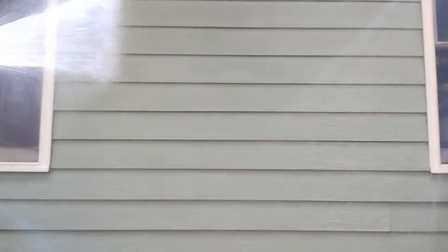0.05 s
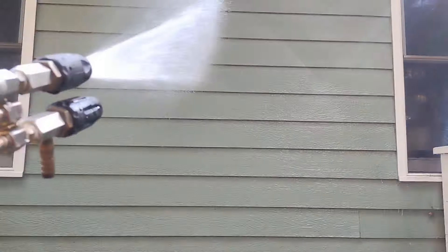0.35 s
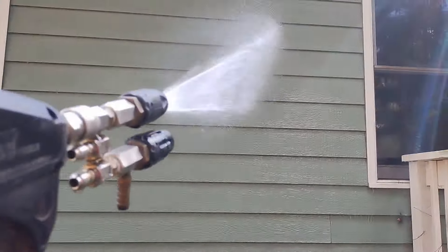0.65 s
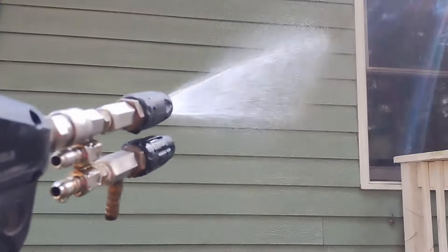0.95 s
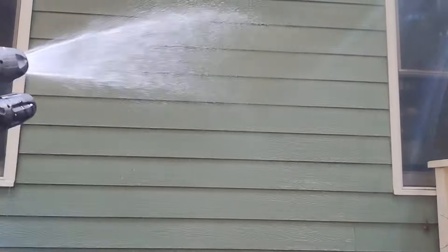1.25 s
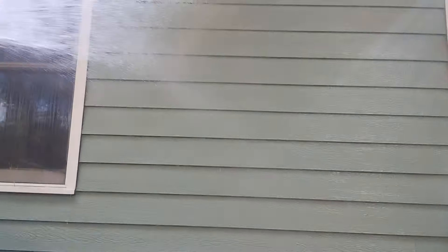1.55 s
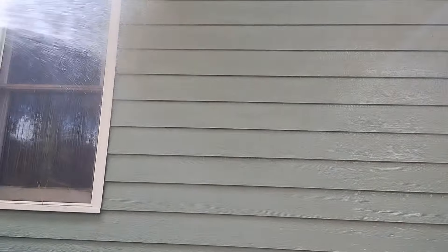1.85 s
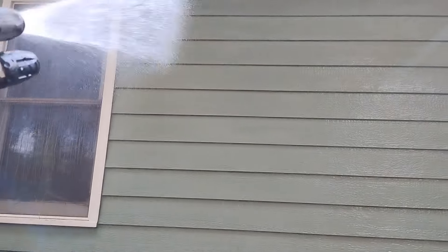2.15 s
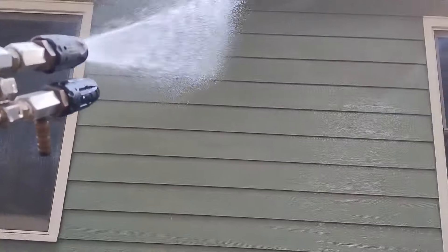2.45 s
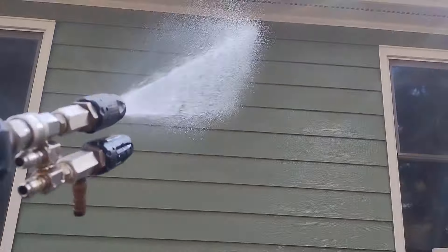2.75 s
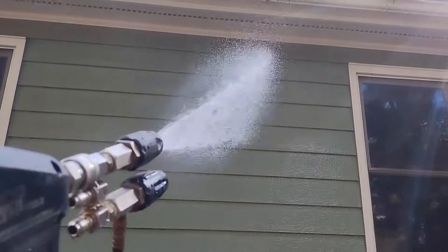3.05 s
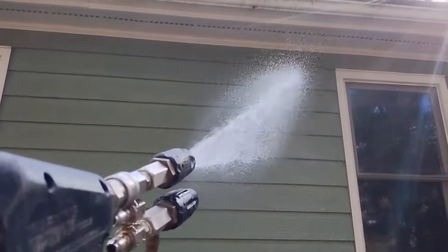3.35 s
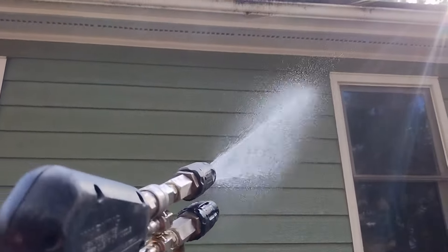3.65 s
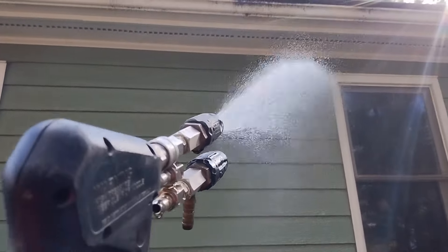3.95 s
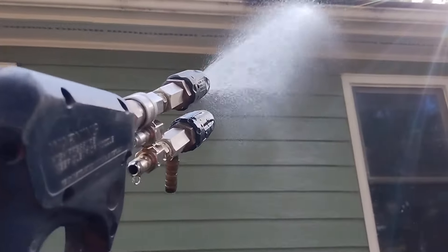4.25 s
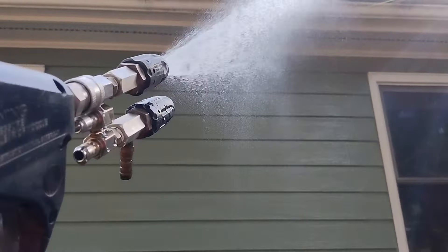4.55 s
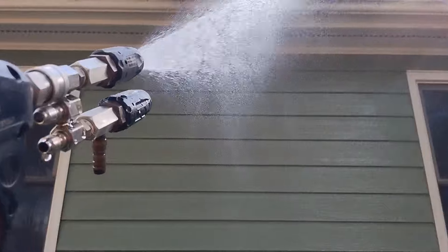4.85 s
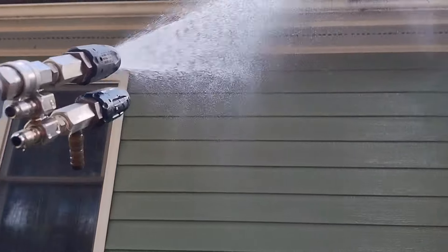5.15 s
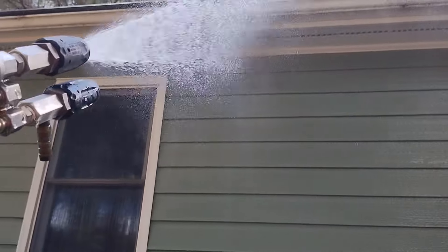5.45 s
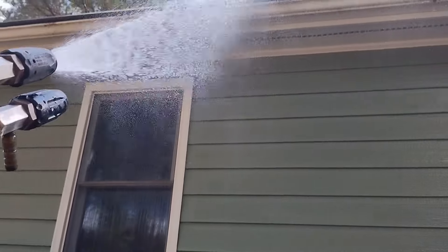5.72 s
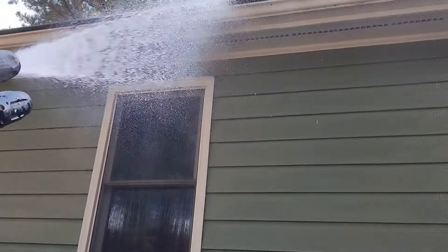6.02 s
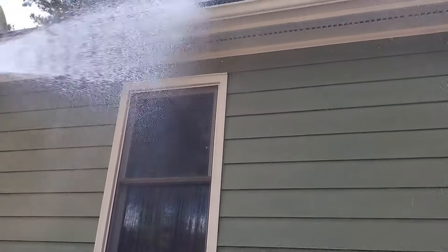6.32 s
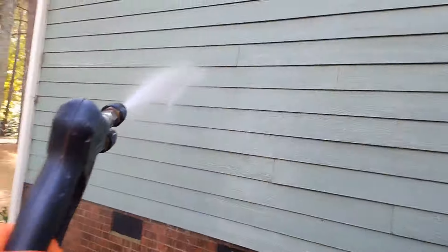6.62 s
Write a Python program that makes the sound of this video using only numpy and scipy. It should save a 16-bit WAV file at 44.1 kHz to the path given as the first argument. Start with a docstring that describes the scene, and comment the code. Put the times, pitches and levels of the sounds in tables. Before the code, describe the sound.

A pressure washer hisses and patters steadily against wooden siding, then drums louder on a hollow eave, over a faint distant engine.

```python
"""Pressure washer on wooden siding

A fan of water patters over the boards, then climbs to the hollow eave, which drums under the jet.
Random drop impacts excite the resonances of the wood; the mist hisses, and the turbulent jet sings
in narrow, fluttering bands. Wall, eave and ground reflect the spray.
The pump's single-cylinder engine runs some way off."""
import sys
import numpy as np
from scipy import signal
from scipy.fft import rfft, irfft, next_fast_len
from scipy.io import wavfile
from scipy.ndimage import uniform_filter1d, map_coordinates

SR = 44100
rng = np.random.default_rng(int(sys.argv[2]) if len(sys.argv) > 2 else 0)


def dump(signal):
    """Clip the signal to [-1, 1] and save it as 16-bit WAV at the path in sys.argv[1]."""
    limited = np.clip(np.atleast_2d(signal).T, -1, 1)
    pcm = np.round(limited * 32767).astype(np.int16)
    wavfile.write(sys.argv[1], SR, pcm)


N = 294588
TIME = np.arange(N) / SR
CLIMB_S, EAVE_S, TOP_S = 3.8, 4.335, 4.85  # the aim starts to climb, touches the eave, lies fully on it
TRIM_S, LIP_S = 4.79, 5.28  # the jet crosses the trim board, then the lip of the eave
NARROW_FROM_S, NARROW_TO_S = 2.38, 3.37  # the fan is at its narrowest
WALL_IMPACT_DB, EAVE_IMPACT_DB = -51, -35  # usual impact levels


def amp(db):
    """Amplitude ratio of a level in decibels."""
    return 10 ** (np.asarray(db) / 20)

def unit(x):
    """Normalisation of a signal, or the mean of a stereo pair, to rms 1."""
    return x / np.sqrt(np.mean(np.atleast_2d(x).mean(axis=0) ** 2) + 1e-20)

def along(points, hz):
    """Interpolation of (f/Hz, value) points on a logarithmic frequency axis."""
    f, v = np.transpose(points)
    return np.interp(np.log(hz + 1), np.log(f + 1), v)

def curve(points):
    """Linear interpolation of (t/s, value) points at every sample."""
    return np.interp(TIME, *np.transpose(points))

def ramp(start, end):
    """Linear rise from 0 to 1 between two times."""
    return np.clip((TIME - start) / max(end - start, 1 / SR), 0, 1)

def held(start, end, attack_s, release_s):
    """Trapezoidal envelope: it rises from start, holds, and falls from end."""
    return ramp(start, start + attack_s) * (1 - ramp(end, end + release_s))

def spells(rows, attack_s, release_s):
    """Sum of trapezoidal envelopes, one for each (start/s, end/s, level/dB) row."""
    return sum(amp(db) * held(start, end, attack_s, release_s) for start, end, db in rows)

def swell(peak_s, rise_db_per_s, fall_db_per_s):
    """Exponential growth to a gain of 1, then exponential decay."""
    t = TIME - peak_s
    return amp(np.minimum(rise_db_per_s * t, -fall_db_per_s * t))

def wobble(rate):
    """Smooth random modulation with rate knots a second."""
    knots = rng.standard_normal(int(N * rate / SR) + 4)
    return map_coordinates(knots, [np.arange(N) * rate / SR])

def filtered(x, response):
    """Linear filtering: the spectrum of x times a frequency response."""
    size = next_fast_len(N + SR // 2)
    return irfft(rfft(x, size) * response(np.fft.rfftfreq(size, 1 / SR)), size)[..., :N]

def coloured(x, spectrum):
    """Spectral shaping by (f/Hz, gain/dB) points."""
    return filtered(x, lambda hz: amp(along(spectrum, hz)))

def sides(db):
    """Constant-power panning: two gains for a left-minus-right level difference."""
    gains = amp(np.array([np.atleast_1d(db), -np.atleast_1d(db)]) / 2)
    return gains / np.sqrt(np.mean(gains ** 2, axis=0))

def leading(pair, lead_s):
    """Arrival-time difference: the left side leads the right by lead_s."""
    return filtered(pair, lambda hz: np.exp(1j * np.pi * lead_s * np.array([hz, -hz])))

# Likeness of the two sides, high in the bass: f/Hz, correlation (clipped to +-1)
CORRELATION = [(100, 0.87), (300, 0.83), (650, 0.9), (850, -0.2), (1100, 1.1), (1280, .5), (1500, -0.3),
               (2000, 0.5), (3300, 0), (14000, 0)]
# Shading between the two sides: f/Hz, left minus right/dB
BALANCE = [(200, 0), (500, -2), (800, -2), (1000, -5), (1300, -4), (1550, -1.5), (1850, -1), (2200, 0),
           (2900, 5.5), (4100, -2), (4800, -18.5), (5500, -8.5)]
def stereo(pair, balance=BALANCE, correlation=CORRELATION):
    """Partial coherence: two independent signals mix as mid and side, then are shaded by frequency."""
    angle = lambda hz: np.arccos(np.clip(along(correlation, hz), -1, 1)) / 2
    mid, side = filtered(pair, lambda hz: np.array([np.cos(angle(hz)), np.sin(angle(hz))]))
    left_right = np.array([mid + side, mid - side])
    return unit(filtered(left_right, lambda hz: sides(along(balance, hz))))

def droplets(rate, spread_db):
    """Shot noise: two streams of random impacts, rate a second, of scattered sizes."""
    hits = rng.random((2, N)) < rate / SR
    return unit(hits * rng.standard_normal((2, N)) * amp(spread_db * rng.standard_normal((2, N))))

def struck(modes, rate, spread_db):
    """Modal superposition: drops land all over a panel, so each resonance gets its own blows."""
    def resonance(centre, width):
        # second order applied twice: each blow swells and dies softly on wet wood
        return lambda hz: (1j * hz * width / (centre ** 2 - hz ** 2 + 1j * hz * width)) ** 2
    return sum(amp(db) * filtered(droplets(rate, spread_db), resonance(centre, 1.5 * width))
               for centre, width, db in modes)

def turbulence(centre_hz, width_hz):
    """Narrow-band noise: two channels of low-passed noise modulate a moving carrier in quadrature."""
    slow = filtered(rng.standard_normal((2, 2, N)), lambda hz: 1 / (1 + (hz / width_hz) ** 2))
    phase = 2 * np.pi * np.cumsum(centre_hz) / SR
    return unit(slow[0] * np.cos(phase) + slow[1] * np.sin(phase))


# Engine tones: multiple of the shaft frequency, relative level/dB
ENGINE_ORDERS = [(1, -73.5), (2, -62), (2.5, -65), (3, -62), (4, -65.5), (4.5, -74), (5, -75)]
# Exhaust noise spectrum: f/Hz, relative level/dB
EXHAUST_SPECTRUM = [(20, -39.5), (38, -24.5), (50, -14), (75, -6.5), (110, -2), (170, -0.5), (260, 0),
                    (350, -2.5), (500, -6), (1000, -6), (4000, -65)]
def engine(shaft_hz=49):
    """Four-stroke cycle: wavering tones, and exhaust that puffs each turn, harder every second one."""
    turns = np.cumsum(shaft_hz * (1 + 0.0091 * wobble(4))) / SR
    hum = np.zeros(N)
    for order, db in ENGINE_ORDERS:
        gain = np.sqrt(2) * amp(db - 0.5 + 2 * wobble(7.8))
        hum += gain * np.sin(2 * np.pi * (order * turns + rng.random()))
    puffs = amp(2 * np.cos(2 * np.pi * turns) + 0.15 * np.cos(np.pi * turns))
    exhaust = coloured(puffs * rng.standard_normal((2, N)), EXHAUST_SPECTRUM)
    return hum + amp(-50.5) * stereo(exhaust)

# Echoes from wall, eave and ground: delay/s, gain/dB
ECHOES = [(.0026, -15), (.0061, -19), (.0093, -15), (0.0146, -16.5)]
def reflected(pair):
    """Comb filtering: echo paths drift with the gun, so their interference ripples the colour."""
    echo = lambda x, delay: np.interp(TIME - delay - 0.00012 * wobble(1.498), TIME, x, left=0)
    echoes = np.array([sum(amp(db) * echo(x, delay) for delay, db in ECHOES) for x in pair])
    # lapped boards scatter the highest treble away
    return amp(-0.4) * (pair + filtered(echoes, lambda hz: 1 / (1 + (hz / 8000) ** 4)))

# Treble dips on the left, with the aim at the wall and at the eave: f/Hz, gain/dB
WALL_NOTCHES = [(4700, 0), (5400, 1), (6100, 0), (6600, -4), (7150, -5), (7700, -1), (10500, 0),
                (12500, -1), (14200, 2.5)]
EAVE_NOTCHES = [(4800, 0.5), (5200, 1), (5400, -6), (5560, -8.5), (5800, 1.5), (6500, 0), (8000, 0.5),
                (14200, 0)]
def notched(pair):
    """Notch filtering: one set of dips on the left fades into another as the aim turns upwards."""
    left, right = pair
    up = ramp(4.6, 5.05)
    return np.array([(1 - up) * coloured(left, WALL_NOTCHES) + up * coloured(left, EAVE_NOTCHES), right])

def patchy(pair, depth_db):
    """Random spectral modulation: the colour shifts in patches some 500 Hz by a third of a second."""
    spectra = signal.stft(pair, nperseg=512)[2]
    field = rng.standard_normal(spectra.shape)
    for _ in range(2):
        field = uniform_filter1d(uniform_filter1d(field, size=5, axis=1), size=56, axis=2)
    return signal.istft(spectra * amp(depth_db * field / field.std()), nperseg=512)[1][:, :N]

# Spectrum of the coarse drops: f/Hz, relative level/dB
SIZZLE_SPECTRUM = [(2500, -48), (3800, -1), (4800, -2.5), (5400, -2), (6100, 3), (7000, 2), (8000, -4),
                   (9500, -26.5), (14000, -40)]
# Their shading on the left: f/Hz, left minus right/dB
SIZZLE_BALANCE = [(4000, 1), (4700, -3.5), (5500, -16), (6100, -18), (7000, -9.5), (8200, -14)]
def coarse_drops(excess_db, burst_db):
    """Shot noise of large drops: more sizzle down as the aim climbs and as the eave soaks through."""
    climb_db = 5 * ramp(CLIMB_S - 0.45, EAVE_S + 0.09)
    soaked_db = 4 * ramp(4.5, 6.3)
    level_db = -51.5 + 0.37 * excess_db + np.outer([0.55, 1.25], burst_db) + climb_db + soaked_db
    sizzle = coloured(droplets(rate=28000, spread_db=1), SIZZLE_SPECTRUM)
    return amp(level_db) * stereo(sizzle, SIZZLE_BALANCE)

# Spectra of the mist and of its finest spray: f/Hz, relative level/dB
HISS_SPECTRUM = [(5000, -22.5), (7000, -5.5), (8300, 0), (9300, -1), (10300, -1), (11300, -1),
                 (12500, -6.5), (14500, -15.5)]
FINE_SPECTRUM = [(8000, -40), (10500, -12), (12000, -1), (13000, -.5), (14400, -2)]
# Shading of both on the left: f/Hz, left minus right/dB
MIST_BALANCE = [(7000, -6), (8200, -1), (10000, 0), (14000, 0.5)]
# Hiss from the amount of mist in the air: t/s, relative level/dB
MIST_LEVEL = [(0.05, -44), (0.35, -46.5), (0.9, -46.5), (1.3, -44.5), (1.9, -45.5), (3.4, -46.0),
              (4.0, -44), (4.55, -39.5), (5.1, -37), (5.48, -35), (5.75, -37.5), (6.05, -35.5), (6.5, -37)]
def tiny_drops(excess_db, burst_db):
    """Atomisation: countless drops hiss; the lip shatters more fine spray, a narrow fan makes less."""
    hiss = stereo(coloured(droplets(rate=25000, spread_db=-0.5), HISS_SPECTRUM), MIST_BALANCE)
    fine = stereo(coloured(droplets(rate=24000, spread_db=1), FINE_SPECTRUM), MIST_BALANCE)
    lip_db = held(EAVE_S, LIP_S + 0.37, attack_s=0.61, release_s=0.25)
    narrow_db = -1.5 * held(NARROW_FROM_S, NARROW_TO_S, attack_s=0.4, release_s=0.9)
    fine_db = -47.5 + 0.55 * excess_db + burst_db + lip_db + narrow_db
    return amp(1.23 + curve(MIST_LEVEL)) * hiss + amp(fine_db) * fine

# Spray thrown back as the fan swings: start/s, nominal boost/dB
SPRAY_BURSTS = [(-.1, 1), (1.175, 4.5), (5.88, 0.5)]
# The gun passing on the left: t/s, change of level/dB
GUN_SHADOW = [(.17, 1.5), (.4, -4), (.55, -1), (.8, -9), (1.17, -8), (1.26, 0), (1.7, 0), (2.08, 0),
              (2.25, -6), (2.66, -4), (2.76, 0), (2.87, -6.5), (3.04, 1), (3.15, -4), (3.25, -8),
              (3.42, -7.5), (3.52, 1)]
def mist(impact_db, flow_db):
    """Acoustic shadowing: amid the sizzle, the moving gun screens the hiss of tiny drops on the left."""
    excess_db = impact_db - WALL_IMPACT_DB
    burst_db = sum(db * held(s, s + 0.14, attack_s=0.06, release_s=0.47) for s, db in SPRAY_BURSTS)
    left_db = -7.5 + curve(GUN_SHADOW)  # the left side faces away from the mist
    sizzle = coarse_drops(excess_db, burst_db)
    hiss = tiny_drops(excess_db, burst_db) * amp([left_db, np.zeros(N)])
    return (sizzle + hiss) * amp(flow_db)

# Centre of the jet's main band: t/s, f/Hz
SING_CENTRE = [(1.0, 7870), (2.4, 7760), (2.9, 7900), (3.6, 7840), (4.2, 7970), (4.9, 8100)]
# Spells in which it sings, and in which it spreads into a rush: start/s, end/s, relative level/dB
SINGING = [(2.17, 2.6, -57), (2.56, 4.1, -46), (4.1, 4.95, -42.5), (4.95, 5.45, -45.5), (5.45, 6.5, -54)]
RUSHING = [(.35, 1.25, -50.5)]
def singing_sheet():
    """Flutter of a water sheet: a band with a purer core when the fan is narrow, a rush when wide."""
    centre_hz = curve(SING_CENTRE)
    flare = amp(-46) * swell(3.48, rise_db_per_s=250, fall_db_per_s=400)  # the fan widens again
    gain = amp(-59.5) + spells(SINGING, attack_s=0.41, release_s=0.3) + flare
    narrow = held(NARROW_FROM_S - 0.4, NARROW_TO_S, attack_s=0.25, release_s=2.2)
    core = 0.52 * narrow * turbulence(centre_hz + 35 * wobble(25), width_hz=70)
    flutter = amp(1.4 * wobble(70) + 0.47 * wobble(11))
    band = turbulence(centre_hz + 80 * wobble(60), width_hz=310)
    rush = spells(RUSHING, attack_s=0.29, release_s=0.3) * turbulence(centre_hz, width_hz=500)
    return gain * flutter * (band + core) + rush

# Centre of the jet's thinner, lower band: t/s, f/Hz
WHISTLE_CENTRE = [(.2, 6260), (1.3, 6170), (4.4, 6060), (4.85, 6580), (5.6, 6550)]
# Spells in which it whistles: start/s, end/s, relative level/dB
WHISTLING = [(-.4, .3, -60), (1.0, 1.8, -58.5), (1.8, 2.45, -55.5), (2.45, 3.7, -62), (3.7, 4.5, -61.5),
             (4.7, 5.55, -50)]
def whistle():
    """Amplitude-modulated turbulence: a thin band rises as the aim climbs and flares past the lip."""
    flare = amp(-37.5) * swell(5.32, rise_db_per_s=28, fall_db_per_s=69.5)
    gain = amp(-63.5) + spells(WHISTLING, attack_s=0.28, release_s=0.33) + flare
    flutter = amp(1.9 * wobble(40))
    return gain * flutter * turbulence(curve(WHISTLE_CENTRE) + 20 * wobble(14), width_hz=156)

def jet():
    """Turbulent flow noise: the jet sings, shrills on the climb, fizzes past the lip, rasps if narrow."""
    song = singing_sheet() + whistle()
    shrill_hz = np.interp(TIME, [CLIMB_S, TOP_S], [9480, 11170])
    shrill = amp(-46.5) * ramp(CLIMB_S - 0.2, CLIMB_S + 0.17) * turbulence(shrill_hz, width_hz=540)
    shrill *= swell(TOP_S, rise_db_per_s=9, fall_db_per_s=4)
    fizz = amp(-43.5) * turbulence(12600 + 90 * wobble(7.1), width_hz=420)
    fizz *= swell(5.45, rise_db_per_s=12, fall_db_per_s=37)
    rasp = amp(-53.5 + 2.4 * wobble(13)) * turbulence(4600 + 160 * wobble(12), width_hz=560)
    rasp *= held(NARROW_FROM_S, NARROW_TO_S, attack_s=0.54, release_s=0.11)
    return song * sides(db=-19.5) + (shrill + fizz) * sides(db=-18.5) + rasp * sides(db=-7.5)

# Modes of the clapboards, a window and its frame: f/Hz, bandwidth/Hz, relative level/dB
BOARD_MODES = [(593, 99, 2), (1060, 110, -2), (1298, 210, -2), (2004, 490, -5.5), (2380, 330, -5.5),
               (2760, 630, -4.5), (3950, 390, -22.5)]
WINDOW_MODES = [(1173, 125, -3), (1940, 170, -8)]
FRAME_MODES = [(3780, 540, 0)]
# Passes of the fan over window and frame: start/s, end/s, relative level/dB
ON_WINDOW = [(-.3, .1, -56), (.62, 1.28, -53), (1.5, 1.8, -56)]
ON_FRAME = [(-.2, .06, -51), (2.1, 2.75, -56)]
# Spectrum of the splash: f/Hz, relative level/dB
SPLASH_SPECTRUM = [(100, -46.5), (300, -4.5), (600, -0.5), (1500, 1.5), (3000, -6), (3600, -4.5),
                   (5000, -20), (8000, -27.5), (14000, -50)]
# Likeness of the two sides for sound from the wall: f/Hz, correlation
WALL_CORRELATION = [(100, .9), (350, 0.45), (650, 0.9), (900, 0.55), (1200, 0.21), (1400, -1),
                    (1800, -0.063), (2300, 0.1), (3200, -0.023)]
def siding(impact_db, flow_db):
    """Impact excitation: drops patter and splash on the boards and set a window and its frame ringing."""
    from_wall = lambda pair: stereo(pair, correlation=WALL_CORRELATION)
    boards = from_wall(struck(BOARD_MODES, rate=11000, spread_db=1))
    splash = from_wall(coloured(droplets(rate=24000, spread_db=0.5), SPLASH_SPECTRUM))
    window = from_wall(struck(WINDOW_MODES, rate=5500, spread_db=-1.5))
    window *= spells(ON_WINDOW, attack_s=0.18, release_s=0.26)
    frame = unit(struck(FRAME_MODES, rate=7100, spread_db=0.5)) * sides(db=9)
    frame *= spells(ON_FRAME, attack_s=0.17, release_s=0.2)
    drive = amp(np.minimum(impact_db, -45.5) + flow_db)  # any harder impact lands on the eave
    patter = drive * (amp(2) * boards + amp(-2) * splash)
    return leading(patter + window + amp(-3.5) * frame, lead_s=0.00017)

# Lower and upper modes of the boxed eave: f/Hz, bandwidth/Hz, relative level/dB
LOWER_CAVITY_MODES = [(265, 70, -17.5), (372, 100, -10), (452, 63, -2), (500, 70, -1)]
UPPER_CAVITY_MODES = [(604, 72, -3.5), (639, 73, -6.5)]
def cavity_boom(impact_db):
    """Cavity resonance: the hollow eave booms, its upper modes taking over as the jet moves along."""
    lower = stereo(struck(LOWER_CAVITY_MODES, rate=2000, spread_db=1))
    upper = stereo(struck(UPPER_CAVITY_MODES, rate=2000, spread_db=3))
    upper_db = -7.5 + 5 * (TIME - EAVE_S)
    level_db = -40.5 + 0.65 * (impact_db - EAVE_IMPACT_DB)
    return amp(level_db) * (lower + amp(upper_db) * upper) * ramp(EAVE_S - 0.08, EAVE_S + 0.2)

# Modes of the eave's thin boards, lip and trim: f/Hz, bandwidth/Hz, relative level/dB
FASCIA_MODES = [(995, 67, -4), (1130, 290, -7), (1294, 98, -3), (1453, 240, -2), (1920, 270, -1.5),
                (2166, 310, -4), (2560, 270, -4), (3005, 360, -5), (3175, 220, -4.5), (3740, 320, -14),
                (4950, 480, -10)]
EAVE_LIP_MODES = [(1177, 240, 1), (1910, 260, -3), (2600, 130, -3.5), (3006, 95, -5)]
TRIM_MODES = [(1370, 140, -5.5), (1927, 75, -6), (2610, 89, 3)]
def eave(impact_db, flow_db):
    """Forced vibration: the eave booms and rattles, and its trim and lip ring as the jet crosses them."""
    boom = cavity_boom(impact_db)
    graze = 0.38  # share of the rattle while only the edge of the fan reaches the eave
    share = graze * ramp(CLIMB_S - 0.1, CLIMB_S + 0.24) + (1 - graze) * ramp(EAVE_S, EAVE_S + 0.3)
    rattle = share * amp(impact_db + 0.5) * stereo(struck(FASCIA_MODES, rate=3500, spread_db=3))
    lip = amp(-35.5) * stereo(struck(EAVE_LIP_MODES, rate=4000, spread_db=6.5))
    lip *= swell(LIP_S, rise_db_per_s=18, fall_db_per_s=24)
    trim = amp(-45) * stereo(struck(TRIM_MODES, rate=4100, spread_db=2))
    trim *= swell(TRIM_S, rise_db_per_s=30, fall_db_per_s=13)
    return leading(boom + amp(flow_db) * (rattle + trim + lip), lead_s=-0.00005)

# How hard the water strikes the wood: t/s, level/dB
IMPACT_LEVEL = [(0.05, -48), (0.35, -52), (1.0, -51), (1.45, -49), (1.75, -51.5), (2.6, -51.5), (3.4, -51),
                (3.85, -49.5), (4.38, -50), (4.7, -41), (5.0, -36.5), (5.15, -34), (5.7, -34), (6.5, -36.5)]
def scene():
    """Superposition: one unsteady flow drives siding, eave and mist; the jet and engine add to them."""
    impact_db = curve(IMPACT_LEVEL)
    flow_db = 0.46 * wobble(14) + 0.73 * wobble(110)
    wood = siding(impact_db, flow_db) + eave(impact_db, flow_db)
    spray = wood + patchy(mist(impact_db, flow_db), depth_db=1)
    return notched(reflected(spray) + jet()) + engine()

def record(dry):
    """Gating and band limiting: the sound ends abruptly, and a steep low-pass cuts the highest treble."""
    stop_s, cutoff_hz = 6.535, 14235
    gate = (1 - ramp(stop_s - 0.013, stop_s + 0.017)) ** 2
    return filtered(dry * gate, lambda hz: 1 / (1 + (hz / cutoff_hz) ** 400))


dry = scene()
out = record(dry)
dump(out)
```